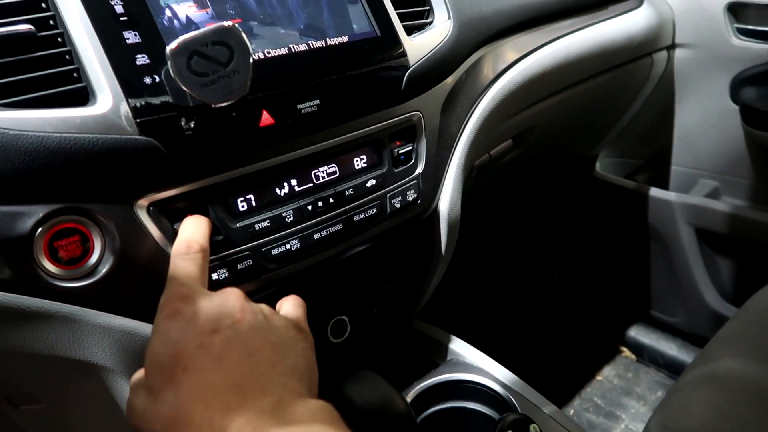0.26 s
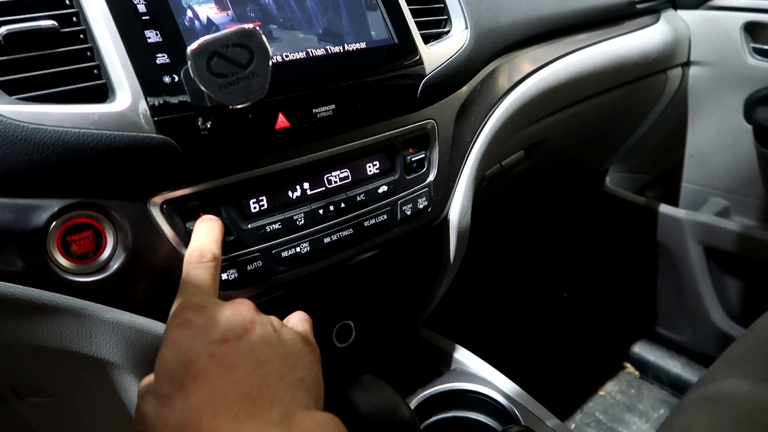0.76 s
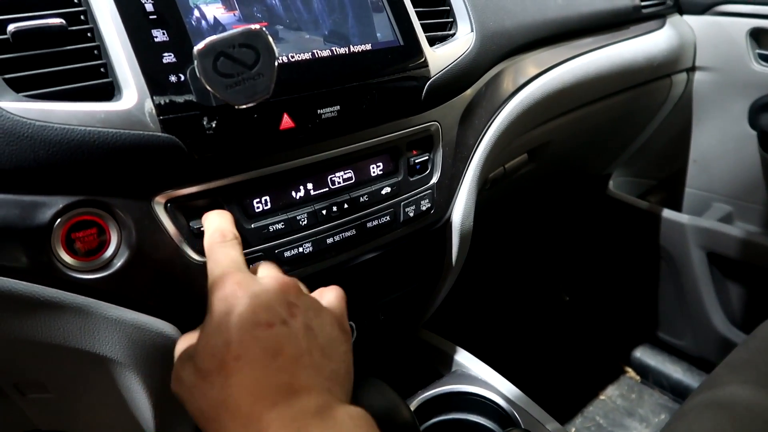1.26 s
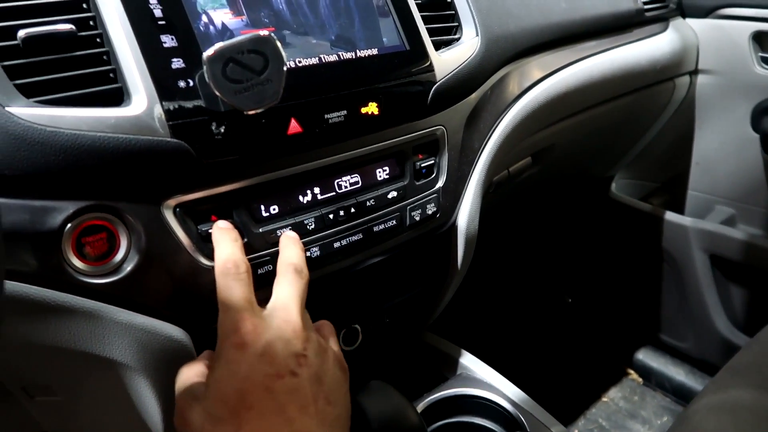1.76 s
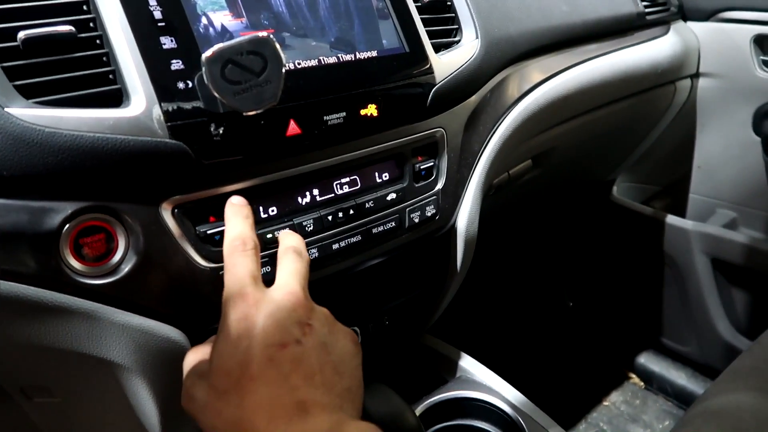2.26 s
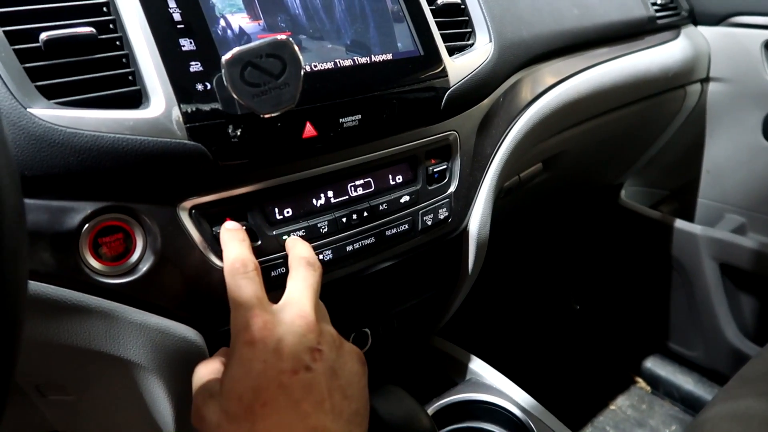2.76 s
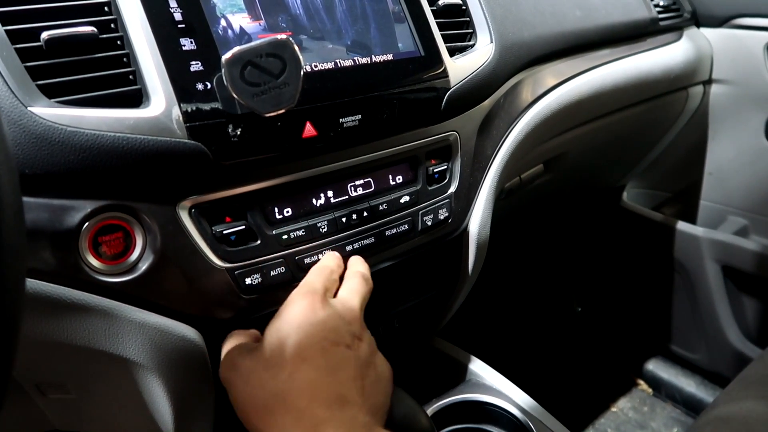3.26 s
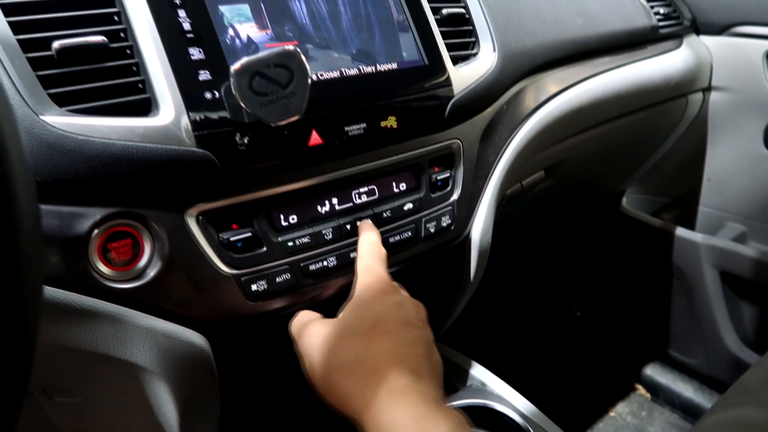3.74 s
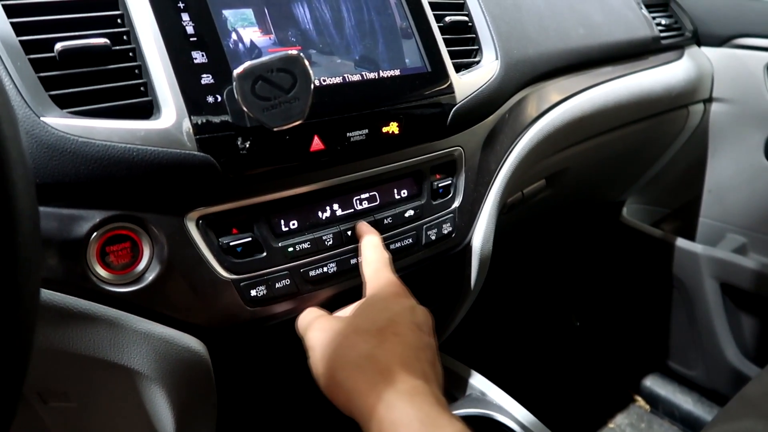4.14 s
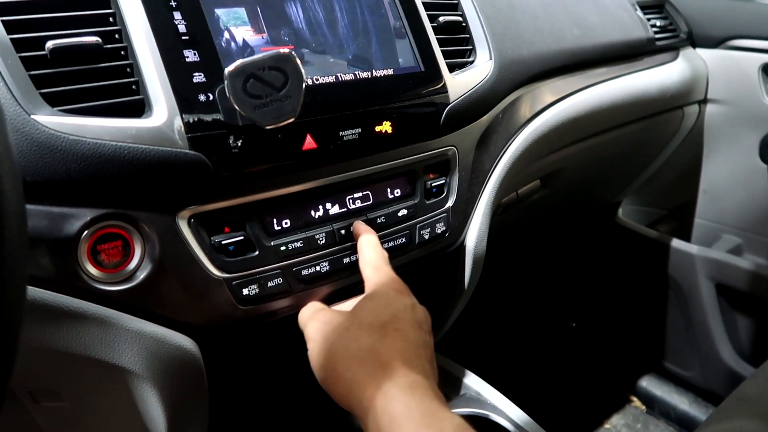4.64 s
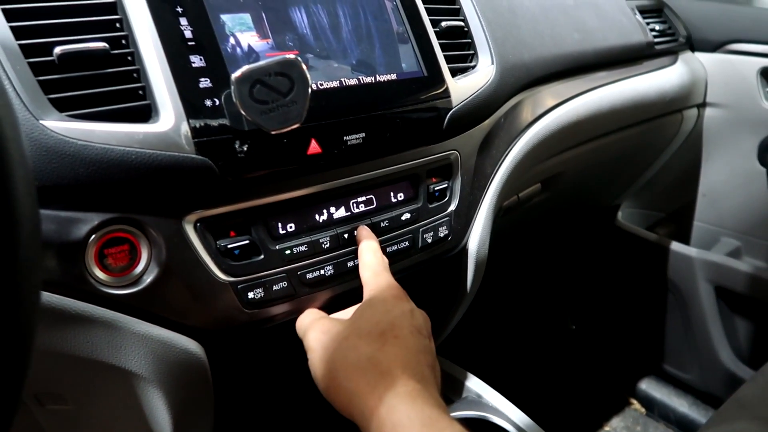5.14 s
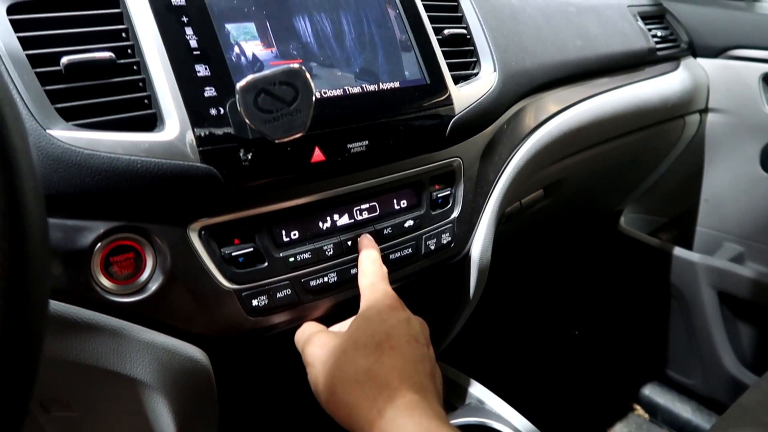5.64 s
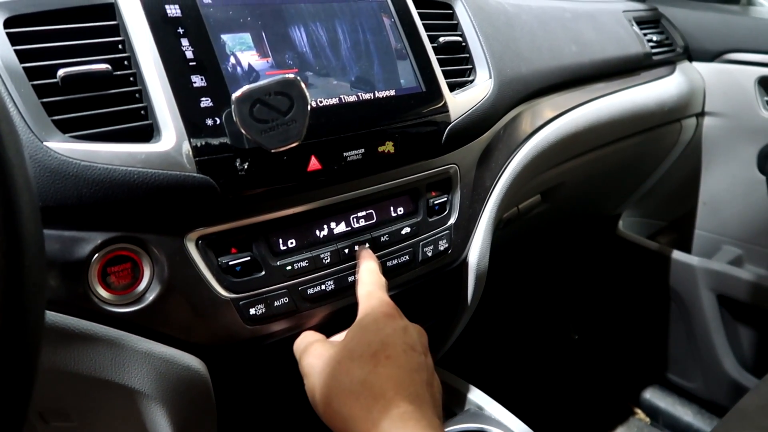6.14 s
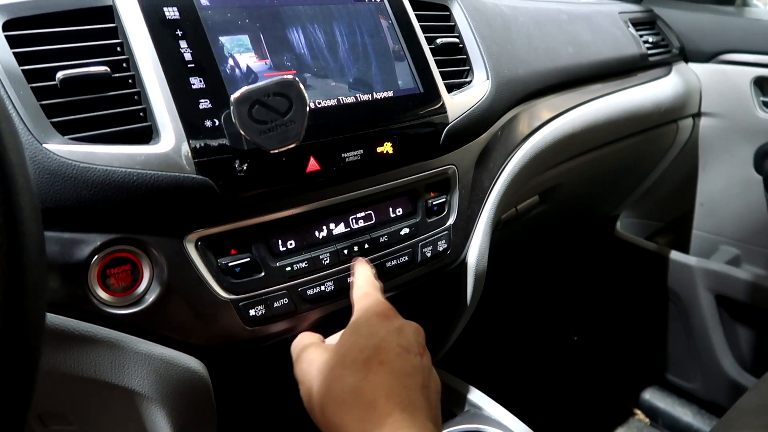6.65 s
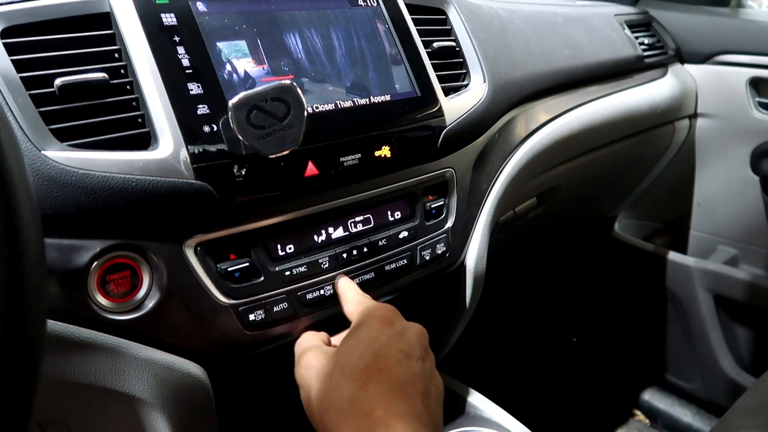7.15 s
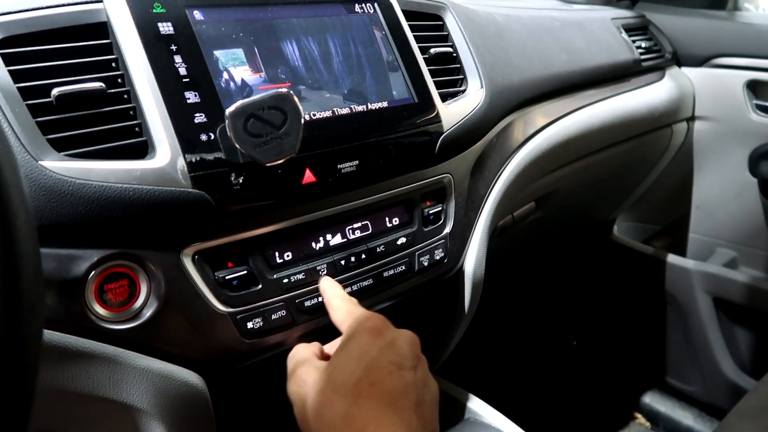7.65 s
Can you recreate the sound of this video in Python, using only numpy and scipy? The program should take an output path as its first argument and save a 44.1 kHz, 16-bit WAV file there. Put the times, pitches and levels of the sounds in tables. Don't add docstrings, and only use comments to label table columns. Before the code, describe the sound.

A warm, bass-heavy engine hum throbs through a small enclosed cabin, captured by close stereo microphones facing the dashboard. One soft dull knock comes from a hand on the panel early on. Later the ventilation fan ramps up in steps, its airy hiss overtaking the quieter engine noise; a vent flap clicks, then strong air blows steadily with low fluttering gusts.

```python
import sys
import numpy as np
from scipy import signal
from scipy.fft import rfft, irfft, next_fast_len
from scipy.io import wavfile
from scipy.ndimage import uniform_filter1d

SR = 44100
rng = np.random.default_rng(int(sys.argv[2]) if len(sys.argv) > 2 else 0)


def transcribe(signal):
    frames = np.atleast_2d(signal).T
    limited = np.clip(frames, -1, 1)
    pcm = np.round(limited * 32767).astype(np.int16)
    wavfile.write(sys.argv[1], SR, pcm)


def rack_gain(trim_db):
    fader = np.asarray(trim_db, float)
    return 10 ** (fader / 20)


N = 348390
T = np.arange(N) / SR

# (time [s], speed [share of full])
BLOWER_SPEED = [
    (0, 0.36),
    (2.2, 0.39),
    (2.8, 0.45),
    (4.15, 0.55),
    (4.45, .62),
    (4.8, 0.73),
    (5.1, 0.89),
    (5.45, 1.002),
    (7.9, 1.02),
]


def evened(x):
    return x / np.sqrt(np.mean(x ** 2) + 1e-20)


def read(points, hz, axis=1):
    columns = np.transpose(points)
    return np.interp(np.log(hz + 1), np.log(columns[0] + 1), columns[axis])


def curve(rows, axis=1):
    columns = np.transpose(rows)
    return np.interp(T, columns[0], columns[axis])


def sine(cycles):
    return np.sin(2 * np.pi * cycles)


def wander(low_hz, top_hz, count=24):
    hz = np.geomspace(low_hz, top_hz, num=count)[:, None]
    t = np.arange(0, N, 256) / SR
    slow = (sine(hz * t + rng.random((count, 1))) / np.sqrt(hz)).sum(axis=0)
    return np.interp(T, t, evened(slow))


def bumps(rows):
    t = np.arange(0, N, 64) / SR
    total_db = sum(db * np.exp(-(2 * (t - s) / length) ** 2) for s, db, length in rows)
    return np.interp(T, t, total_db)


def airborne(spectrum, modes, ports, lead_s):
    size = next_fast_len(N)
    hz = np.fft.rfftfreq(size, 1 / SR)
    colour_db = read(spectrum, hz)
    for f, width, db in modes:
        colour_db = colour_db + db / (1 + (2 * (hz - f) / width) ** 2)
    a, b = rfft(rng.standard_normal((2, size)))
    same = np.clip(read(ports, hz), 0, 1)
    lean_db = read(ports, hz, axis=2) / 2
    lag = np.exp(-1j * np.minimum(2 * np.pi * hz * lead_s, np.pi))
    right = (same * a + np.sqrt(1 - same ** 2) * b) * lag
    pair = np.array([a * rack_gain(lean_db), right * rack_gain(-lean_db)])
    return irfft(pair * rack_gain(colour_db) * np.sqrt(SR / 2), size)[:, :N]


def engine():
    # (time [s], firing rate [Hz])
    idle = [(0, 50.5), (1.2, 50.45), (1.5, 50.2), (2.0, 50.35), (2.6, 50.1), (3.0, 50.5), (3.4, 50.25),
            (4.3, 50.3), (4.8, 49.95), (6.0, 49.8), (7.9, 49.85)]
    # (time [s], change [dB], length [s])
    boom_swings = [(.25, -2, 0.22), (.56, 3, .1), (.85, 3, 0.064), (.95, -4, 0.072), (1.12, -1.5, .08),
                   (1.65, -1.5, 0.23), (1.8, 2, 0.081), (2.23, -3.5, 0.074), (2.63, 1.5, 0.081),
                   (2.81, -6, .07), (2.95, -7, 0.15), (3.41, -2, 0.12), (3.68, 2.5, 0.094), (3.77, -2, .06),
                   (4.5, 3, 0.11), (4.71, -3.5, 0.077), (4.87, -6, 0.066), (5.16, -2, 0.16), (5.31, -7, 0.14),
                   (6.35, -1, 0.29), (6.75, 3, 0.14), (7.13, -8, 0.071), (7.26, -14, 0.094), (7.44, -19, 0.071),
                   (7.72, -5, 0.056), (7.82, 3, 0.063)]
    # (time [s], change [dB], length [s])
    swells = [
        (.55, -6, 0.11),
        (1.7, 2.5, 0.2),
        (2.87, 3.5, 0.094),
        (3.83, 7.5, 0.12),
        (4.12, 6.5, 0.2),
        (4.38, 6, 0.19),
        (4.63, -4, 0.16),
        (4.9, 7, 0.29),
    ]
    # (multiple [1]), and beside it (level [dB rms])
    cycle_orders = [2, 3, 4, 9, 12, 13, 18, 21, 24, 26, 27, 30, 33, 36, 39, 42, 45, 48]
    cycle_db = [-55, -41, -44, -51, -54, -52, -44, -52.5, -50, -57.5, -53, -50, -61.5, -52, -56.5, -65.5,
                -68, -63.5]
    # (frequency [Hz], level [dB rms])
    whines = [(1300, -65), (1457, -63), (1508, -63.5), (1925, -63), (2719, -64.5), (4156, -72)]
    # (frequency [Hz], level [dB per Hz])
    bay_colour = [(12, -97), (30, -64.5), (100, -58), (160, -67), (320, -74), (600, -75.5), (1200, -79.5),
                  (2000, -78.5), (2400, -87.5), (3400, -87), (6000, -92), (9000, -91), (12800, -96),
                  (14400, -99), (15700, -104)]
    # (frequency [Hz], width [Hz], level [dB])
    bay_modes = [(473, 17, 5.5), (727, 35, 4), (817, 37, -5), (950, 110, 2.5), (1063, 30, 4),
                 (1117, 50, -5.5), (1153, 30, 8), (1235, 35, 3.5), (1290, 21, 0.5), (1452, 30, 6),
                 (1511, 32, 6), (1606, 93, -4.5), (1880, 50, 3.5), (1923, 20, 3), (1970, 36, -4),
                 (2064, 61, 2), (2200, 44, 1), (2660, 276, 7.5), (2865, 143, 5), (3070, 60, 3.5),
                 (4160, 290, 3), (4770, 72, 5), (5400, 780, 0), (5820, 75, 7), (6320, 270, 4),
                 (7470, 800, -0.5), (2730, 40, 3.5),
                 (9600, 350, 3), (10500, 400, 1.5), (11600, 1000, 2.5), (12550, 450, 3.5)]
    # (frequency [Hz], likeness [0-1], left over right [dB])
    bay_ports = [(109, 1, .3), (340, 0.89, 3.6), (600, .9, 0), (1460, .89, 4), (2420, 1, 3.5),
                 (3540, .64, 2.5), (6170, .62, 1.3), (9100, 0.66, .2), (12100, 0.9, 1)]

    turns = np.cumsum(curve(idle) * (1 + 0.0011 * wander(0.298, 4.0))) / SR
    boom_db = -26 + bumps(boom_swings) + 0.06 * wander(3.3, 3.6)
    tones = rack_gain(boom_db) * sine(turns)
    drone_db = -35.5 - 6.5 * curve(BLOWER_SPEED) + bumps(swells)
    tones += rack_gain(drone_db) * sine(2.5 * turns)
    scatter = .35
    for k, db in zip(cycle_orders, cycle_db):
        tones += rack_gain(db + 1.6 * wander(.4, 3.0)) * sine(k * turns / 6 + scatter * rng.random())
    for hz, db in whines:
        swing = 4 * np.sin(turns / 40 + hz)
        tones += rack_gain(db + 3 * np.sin(turns / 9 + hz)) * np.sin(2 * np.pi * hz * T + swing)
    pump_hz, pump_db = 44, -48
    tones += rack_gain(pump_db) * sine(pump_hz * T)

    throb = 1 + .045 * np.cos(np.pi * turns) + .03 * np.cos(2 * np.pi * turns / 6)
    bay = airborne(bay_colour, bay_modes, bay_ports, lead_s=5.1e-5)
    lean = rack_gain(np.array([[.05], [-.05]]))
    return np.sqrt(2) * tones * lean + bay * throb * rack_gain(0.77 * wander(1.0, 12.0))


def blower():
    # (frequency [Hz], level [dB per Hz])
    rumble_colour = [(15, -23.5), (40, -11), (100, 1.5), (180, -1.5), (380, -3.5), (450, -12), (600, -19),
                     (900, -20), (2000, -69)]
    hiss_colour = [(300, -29.5), (600, 2), (1050, -2), (1400, 0), (1750, -8.5), (2400, -12.5), (3300, -17),
                   (3700, -18), (4800, -20), (6200, -30), (9000, -29), (13000, -30.5)]
    # (frequency [Hz], width [Hz], level [dB])
    rumble_modes = [(71.8, 25, 7), (112, 41, -0.5), (136, 27, 3), (147, 64, 1.5), (209, 51, 0.3),
                    (287, 193, 4.6), (357, 17, 0.1), (507, 68, 8)]
    hiss_modes = [(1266, 68, 4.5), (1660, 130, 7), (1860, 40, 4.5), (1340, 44, 1.5), (2820, 100, 4.5),
                  (4480, 100, 3), (2400, 120, -1), (3650, 200, -4), (3500, 120, 3.5), (4900, 120, -4)]
    # (frequency [Hz], likeness [0-1], left over right [dB])
    vent_ports = [(100, 1, 0.05), (250, 0.99, .1), (596, .99, 0.078), (1400, 0.99, 1.5), (2400, .9, 1),
                  (4000, 0.68, 1), (8000, .65, 1)]
    # (time [s], rise [dB], length [s])
    gusts = [(4.77, 15, .07), (4.92, 15, .1), (5.26, 13, .18), (5.43, 17, .05), (5.57, 12, .1),
             (5.71, 13, .09), (5.85, 11, .1), (6.07, 17, .12), (6.38, 17, .08), (6.57, 13, .05),
             (6.82, 12, .18), (6.98, 19, .06), (7.05, 19, .06), (7.32, 17, .07), (7.43, 19, .1),
             (7.54, 14, .1), (7.66, 9, .08), (7.82, 11, .12)]

    rumble = evened(airborne(rumble_colour, rumble_modes, vent_ports, lead_s=1.5e-5))
    hiss = evened(airborne(hiss_colour, hiss_modes, vent_ports, lead_s=1.5e-5))
    flutter = wander(2.0, 12.0)
    speed = curve(BLOWER_SPEED)
    speed_db = 10 * np.log10(speed)
    flap_s, flap_travel_s, flap_shut_db = 5.06, 0.068, -3
    flap_db = flap_shut_db * np.clip((flap_s - T) / flap_travel_s, 0, 1)

    shaft_hz = 70.5 * np.minimum(speed + .1, 1)
    shaft = sine(np.cumsum(shaft_hz) / SR) * rack_gain(-46 + 10 * wander(0.502, 4.0))
    duct_hz = 121 * (1 + 0.018 * wander(0.487, 5.6))
    duct_db = -41.5 + bumps(gusts) + 3 * wander(7.3, 30.0)
    boom = sine(np.cumsum(duct_hz) / SR) * rack_gain(duct_db)

    rumble_power, hiss_power = 5.01, 3.9
    low = (rumble * rack_gain(-26 + 0.16 * flutter) + shaft + boom) * rack_gain(rumble_power * speed_db)
    return low + hiss * rack_gain(-37 + hiss_power * speed_db + flap_db + 0.35 * flutter)


def knocks():
    # (time [s], frequency [Hz], peak level [dB])
    hand_knocks = [
        (1.731, 219, -37),
    ]
    t = np.arange(8000) / SR
    out = np.zeros(N + 8000)
    rise = t / 0.022
    for s, hz, db in hand_knocks:
        out[round(s * SR):][:len(t)] += rack_gain(db) * rise * np.exp(1 - rise) * sine(hz * t)
    return out[:N]


def clicks():
    # (time [s], peak level [dB])
    snaps = [
        (5.1886, -22),
        (5.217, -36),
        (5.23, -38),
    ]
    # (frequency [Hz], width [Hz], level [dB])
    plastic_modes = [(1100, 700, 7), (1800, 700, 7), (2600, 600, 5), (3300, 550, 7.5), (4200, 600, 4),
                     (5200, 800, -2), (6200, 600, -7), (6900, 500, -3), (8500, 700, -14)]
    t = np.arange(2000) / SR
    out = np.zeros(N + 2000)
    for s, db in snaps:
        burst = rng.standard_normal(len(t)) * (np.exp(-t / 0.0035) + 0.25 * np.exp(-t / 0.01))
        burst[0] += 6
        spectrum = rfft(burst)
        burst = irfft(spectrum / uniform_filter1d(abs(spectrum), size=11))
        ring = 0.001 * np.diff(burst, prepend=0)
        for hz, width, mode_db in plastic_modes:
            ring = ring + rack_gain(mode_db) * signal.lfilter(*signal.iirpeak(hz, hz / width, SR), burst)
        out[round(s * SR):][:len(t)] += rack_gain(db) * ring / abs(ring).max()
    return np.array([rack_gain(1.1) * out[:N], rack_gain(-1.1) * np.roll(out, 1)[:N]])


def scene():
    return (engine() + blower() + knocks() + clicks()) * np.minimum(T / .002, 1)


def starved(centre):
    # (frequency [Hz], level [dB])
    gap_levels = [(2000, -19), (3400, -7.3), (4700, -5.5), (6900, -3.2), (8300, -.5), (9600, 1.5)]
    hz, _, z = signal.stft(centre, SR, nperseg=2048, noverlap=1024, window="cosine")
    near = np.sqrt(abs(uniform_filter1d(abs(z) ** 2, size=32, axis=0)))
    kept = abs(z) > near * rack_gain(read(gap_levels, hz))[:, None]
    kept |= (hz < gap_levels[0][0])[:, None]
    return signal.istft(z * kept, SR, nperseg=2048, noverlap=1024, window="cosine")[1][:N]


def thinned(x, shares, fleck_db=0):
    open_s = [1.465, 3.19, 4.905]
    # (time [s], low edge [Hz], high edge [Hz])
    flecks = [(.02, 12400, 12700), (.135, 13200, 13500), (.58, 12400, 12700), (1.97, 11200, 11600),
              (2.37, 11900, 12400), (2.62, 12300, 12600), (2.69, 12600, 13000), (2.72, 10300, 10700),
              (2.86, 11200, 12000), (2.99, 12500, 12800), (3.09, 12000, 12300), (4.45, 13800, 14500),
              (.88, 10800, 11200), (3.71, 12800, 13200), (4.69, 11400, 11800), (5.32, 12800, 13200),
              (5.78, 11900, 12300), (5.86, 10400, 11000), (6.08, 12000, 12800), (6.18, 12300, 12600),
              (6.33, 10300, 11100), (6.75, 10700, 11100), (7.01, 10300, 11100), (7.61, 11600, 12000),
              (1.55, 11800, 12400), (1.72, 10400, 11300), (1.9, 10400, 11100), (3.3, 12400, 12800),
              (3.48, 10400, 11800), (3.7, 10400, 11100), (3.87, 12000, 12800), (4.45, 11100, 11900),
              (5.08, 10400, 12500), (5.99, 11100, 12500), (6.38, 12100, 12500), (6.49, 12100, 12800),
              (7.21, 11400, 11900), (7.37, 11400, 11800), (7.67, 12300, 12800), (7.76, 10400, 11100)]
    hz, t, z = signal.stft(x, SR, nperseg=512, noverlap=384)
    block = ((t * SR - 967) // 1024 + 1).astype(int)
    band = (hz // 345).astype(int)
    luck = rng.random((block[-1] + 1, band[-1] + 1))
    luck = np.where(rng.random(luck.shape) < .4, luck[:, :1], luck)
    luck[1:] = np.where(rng.random(luck[1:].shape) < .4, luck[:-1], luck[1:])
    kept = luck[block][:, band].T < read(shares, band * 345 + 172.)[:, None]
    kept |= (abs(t[:, None] - open_s).min(axis=1) < .025)[None]
    kept = kept.astype(float)
    for s, low_hz, high_hz in flecks:
        touched = np.ix_((hz > low_hz) & (hz < high_hz), abs(t - s) < .013)
        kept[touched] = rack_gain(fleck_db)
    return signal.istft(z * kept, SR, nperseg=512, noverlap=384)[1][:N]


def top_cut(x):
    return signal.sosfilt(signal.butter(12, 15750, fs=SR, output="sos"), x)


def record(dry):
    # (frequency [Hz], share of blocks [0-1])
    centre_shares = [(7900, 1), (8300, .72), (8800, .42), (9200, .36), (9600, .5), (9900, .07), (10300, .1),
                     (10700, .01), (11000, .004), (13200, .003), (14000, 0)]
    side_shares = [(13600, 1), (14300, .8), (15000, .45), (15300, 0)]
    centre = thinned(starved(dry.mean(axis=0)), centre_shares, fleck_db=7)
    side = thinned((dry[0] - dry[1]) / 2, side_shares)
    mix = np.array([centre + side, centre - side])
    return top_cut(mix)


dry = scene()
out = record(dry)
transcribe(out)
```